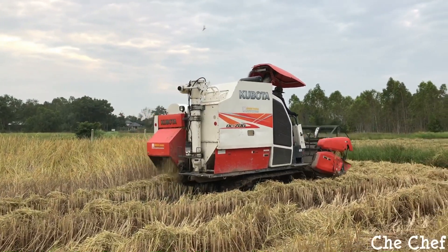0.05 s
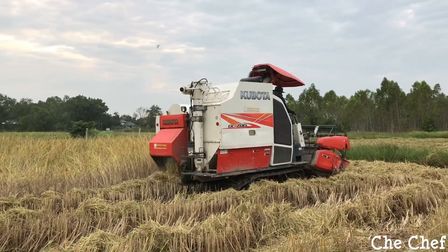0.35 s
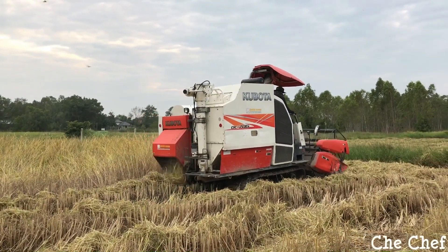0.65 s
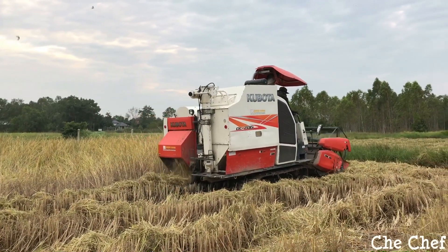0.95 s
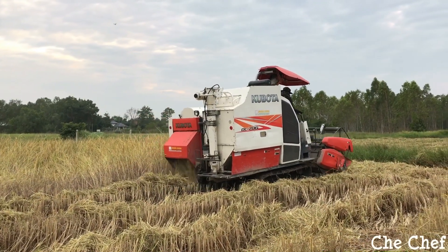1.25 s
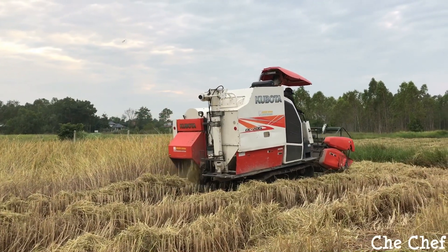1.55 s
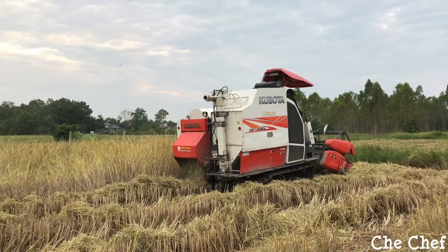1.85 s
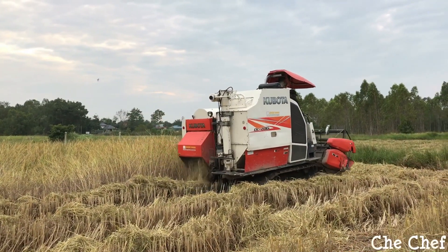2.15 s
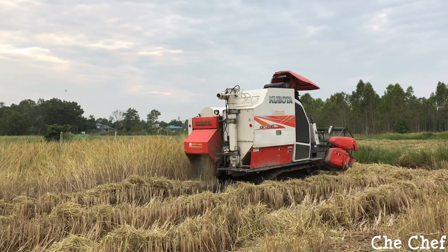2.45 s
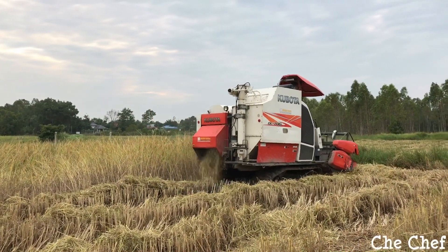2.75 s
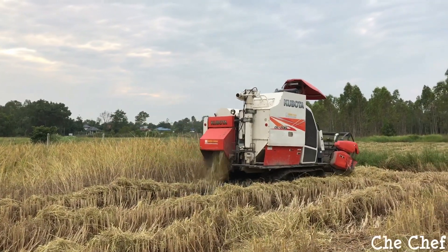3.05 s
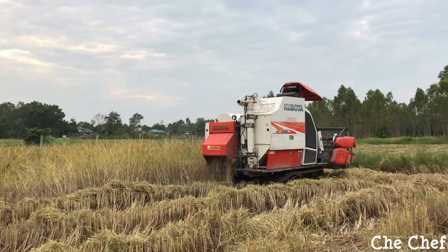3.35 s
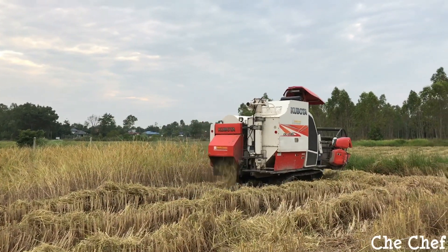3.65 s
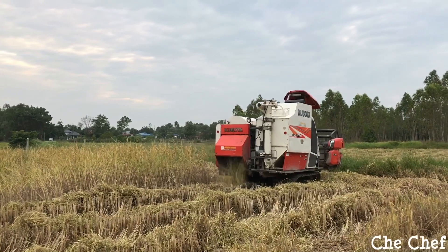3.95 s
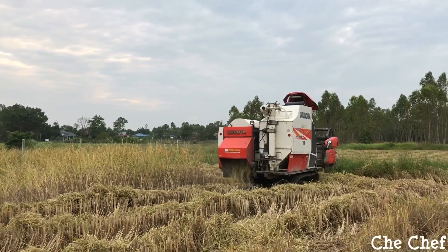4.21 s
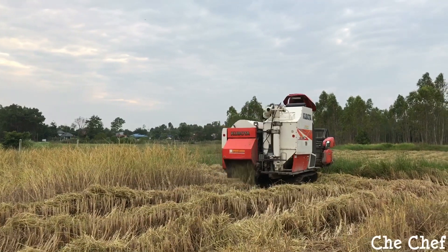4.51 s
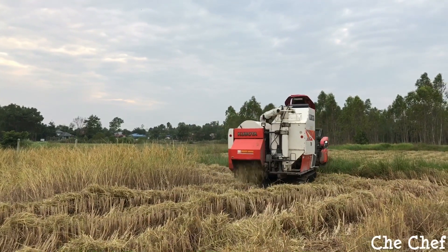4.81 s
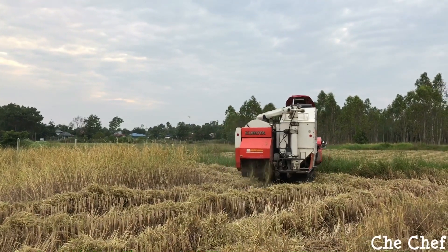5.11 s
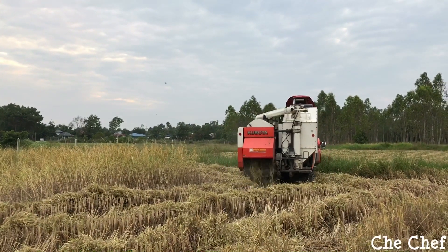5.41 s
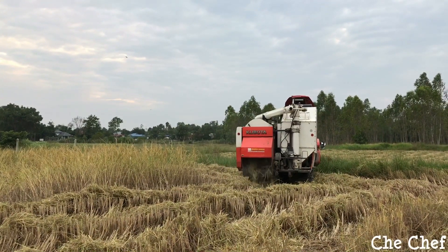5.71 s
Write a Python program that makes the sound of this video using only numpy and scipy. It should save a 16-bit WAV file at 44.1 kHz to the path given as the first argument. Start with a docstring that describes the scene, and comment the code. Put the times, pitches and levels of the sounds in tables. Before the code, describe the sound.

A combine harvester's diesel drones under load with clattering, whining, squealing tracks and rustling straw, fading slightly amid hissing puffs of chaff.

```python
"""An open rice field: a tracked combine harvester cuts, turns its tail to the listener and moves off.
Its four-cylinder diesel drones under load, fans and shafts whine, tracks and belts squeal,
and the thresher clatters as grain pelts its sheet-metal case. Straw rustles throughout;
as the tail swings round, chaff spurts out in puffs whose hiss climbs."""
import sys
import numpy as np
from scipy import signal
from scipy.fft import rfft, irfft
from scipy.io import wavfile

SR = 44100
rng = np.random.default_rng(int(sys.argv[2]) if len(sys.argv) > 2 else 0)


def waveform_to_disk(signal):
    """Save audio, clipped to [-1, 1], as 16-bit WAV at the path in sys.argv[1]."""
    frames = np.transpose(np.atleast_2d(signal))
    scaled = np.clip(frames, -1, 1) * 32767
    samples = np.round(scaled).astype(np.int16)
    wavfile.write(sys.argv[1], SR, samples)


N = 258867


def undb(db):
    """Decibels to gain."""
    return 10 ** (np.asarray(db) / 20)


def unit(x):
    """Scale to rms 1."""
    return x / np.sqrt(np.mean(x ** 2))


def clock():
    """Sample times in seconds."""
    return np.arange(N) / SR


def curves(table):
    """Columns of a timed table, interpolated per sample."""
    times_s, *columns = np.transpose(table)
    return [np.interp(clock(), times_s, column) for column in columns]


def colour(x, spectrum):
    """Filter x by (Hz, dB) points; rms 1."""
    hz, db = np.transpose(spectrum)
    bins_hz = np.maximum(np.arange(N // 2 + 1) * SR / N, 1)
    gain_db = np.interp(np.log(bins_hz), np.log(hz), db, left=-80, right=-80)
    return unit(irfft(rfft(x) * undb(gain_db), N))


def wander(rate_hz):
    """Smooth random drift up to about rate_hz; rms 1."""
    bins_hz = np.arange(N // 2 + 1) * SR / N
    return unit(irfft(rfft(rng.standard_normal(N)) / (1 + (bins_hz / rate_hz) ** 4), N))


def band(hz, width_hz):
    """Noise band round a steady or moving centre; rms 1."""
    phase = 2 * np.pi * np.cumsum(hz * np.ones(N)) / SR
    return unit(wander(width_hz / 2) * np.cos(phase) + wander(width_hz / 2) * np.sin(phase))


def tone(hz, width_hz, waver=0.18):
    """Tone of a rotating part, wandering in pitch and strength; rms 1."""
    phase = 2 * np.pi * np.cumsum(hz + width_hz / 2 * wander(width_hz)) / SR
    return unit((1 + waver * wander(width_hz)) * np.cos(phase))


def impacts(per_s, scatter_db):
    """Dense rain of tiny, uneven blows; rms 1."""
    struck = rng.random(N) < per_s / SR
    polarity = np.sign(rng.standard_normal(N))
    return unit(struck * polarity * undb(scatter_db * rng.standard_normal(N)))


def burst(start_s, rise_s, decay_s):
    """Envelope: fast rise, exponential decay."""
    age_s = np.maximum(clock() - start_s, 0)
    return (1 - np.exp(-age_s / rise_s)) * np.exp(-age_s / decay_s)


def swell(peak_s, sigma_s):
    """Envelope: Gaussian rise and fall."""
    return np.exp(-.5 * ((clock() - peak_s) / sigma_s) ** 2)


def receding_db(start_db, shade_db, half_hidden_s, start_m=11.7, away_m_per_s=0.44, ease_s=0.14):
    """Level of a part that falls with distance and as the turn hides it behind the body."""
    t = clock()
    distance_m = start_m + away_m_per_s * t
    hidden = .5 + .5 * np.tanh(.5 * (t - half_hidden_s) / ease_s)
    return start_db - 20 * np.log10(distance_m / start_m) - shade_db * hidden


# Fan and shaft tones, plus one wide ring of the sheet-metal case near 1 kHz: (pitch [Hz], width [Hz], level
# [dB], peak time [s], sigma [s])
MACHINE_TONES = [(388.4, 5.1, -46, 3.2, 1.5), (536.7, 4.1, -43, 0.71, 1.3), (837, 9, -43, 0.22, 1.1),
                 (1827, 6.5, -45.5, 1, 1.6), (1300, 8, -40, 0.7, 0.65), (690, 16, -40, .75, 0.31),
                 (1010, 50, -43, 3.4, 0.77), (678, 9.1, -36.5, 4.98, 0.19), (697, 7.2, -40.5, 5.3, 0.75),
                 (664, 7.9, -37.5, 5.61, 0.21), (1277, 8.3, -44, 5.4, 0.51)]


def whines():
    """Fans and shafts whine and the case rings, each loudest while it faces the listener."""
    return sum(tone(hz, width_hz) * undb(db) * swell(peak_s, sigma_s)
               for hz, width_hz, db, peak_s, sigma_s in MACHINE_TONES)


# Track and belt squeals: (peak time [s], pitch [Hz], width [Hz], level [dB], sigma [s])
SQUEAL_TONES = [(1.9, 1400, 14, -38, 0.085), (2.35, 1358, 11.3, -38.5, .2), (2.65, 1814, 13, -41.5, .14),
                (2.7, 795, 30, -40, 0.19), (3.1, 1303, 45, -38.5, 0.28), (4.196, 1840, 7.1, -39, 0.073),
                (4.552, 2017, 90, -43.5, 0.33), (4.65, 1368, 13.7, -41.5, .35)]


def squeals():
    """Tracks and belts squeal briefly."""
    return sum(tone(hz, width_hz) * undb(db) * swell(peak_s, sigma_s)
               for peak_s, hz, width_hz, db, sigma_s in SQUEAL_TONES)


# Chaff stream: (time [s], centre [Hz], steady level [dB])
CHAFF_FLOW = [(0, 3987, -58), (2.7, 3982, -52), (3.3, 4300, -40), (3.6, 4750, -48), (3.85, 6150, -46),
              (4.1, 7250, -43), (4.35, 7790, -47), (4.55, 8560, -49), (4.8, 9000, -47), (5.2, 9152, -46),
              (5.87, 9380, -52)]
# Chaff puffs: (time [s], gain [dB])
CHAFF_PUFFS = [(3.55, -37), (3.82, -35), (4.09, -37), (4.306, -34), (4.512, -32.5), (4.755, -35),
               (4.96, -33), (5.165, -41), (5.35, -39), (5.573, -39.5), (5.72, -40)]


def chaff(spray_gain=0.3):
    """Chaff hisses from the tail, about five puffs a second: a focused jet inside a wider spray."""
    centre_hz, flow_db = curves(CHAFF_FLOW)
    puffs = sum(undb(db) * burst(start_s, rise_s=.007, decay_s=.065) for start_s, db in CHAFF_PUFFS)
    jet = band(centre_hz, width_hz=1340)
    spray = band(centre_hz, width_hz=3800)
    return unit(jet + spray_gain * spray) * np.hypot(undb(flow_db), puffs)


# Straw rustle: (frequency [Hz], relative level [dB])
STRAW_SPECTRUM = [(2000, -12.5), (4000, 4), (5000, -1), (5700, 1.5), (6900, 0.5), (7600, -1), (8400, 0),
                  (9200, 0.5), (9800, -3.5), (10500, -24.5)]
# Bunches cut: (time [s], gain [dB], centre [Hz])
STRAW_CRUNCHES = [(.14, -37, 8500), (.73, -36, 8000), (1.21, -40, 7500), (1.686, -36, 6000),
                  (2.51, -38, 8000), (3.275, -29, 4230), (3.28, -33, 7640), (3.39, -35, 6300),
                  (4.31, -33, 8340), (4.755, -34.5, 7830)]


def straw(flicker_db=0.76):
    """Dry stalks snap by the thousand; now and then the knives crunch a whole bunch."""
    level_db = receding_db(start_db=-36, shade_db=2, half_hidden_s=4.6)
    snaps = colour(impacts(per_s=20000, scatter_db=2.5), STRAW_SPECTRUM)
    rustle = snaps * undb(level_db + flicker_db * wander(16))
    crunches = sum(band(hz, width_hz=3700) * undb(db) * burst(start_s, rise_s=.0024, decay_s=.029)
                   for start_s, db, hz in STRAW_CRUNCHES)
    return rustle + crunches


def panel_reflection(x, lag_s=.0065, sway_s=0.000493, gain=0.2):
    """Add a path off the side panels, its length swaying as the machine rocks over ruts; rms 1."""
    t = clock()
    reflected = np.interp(t - lag_s - sway_s * wander(1.135), t, x)
    return unit(x + gain * reflected)


# Sheet-metal case: (frequency [Hz], relative level [dB])
CASE_SPECTRUM = [(250, -19.5), (440, -10.5), (515, -0.5), (565, -2.5), (615, 3.5), (710, 2.5), (745, -0.5),
                 (830, 1), (890, -1), (1050, 1.5), (1360, -0.5), (1420, -3.5), (1700, -6), (2300, -11.5),
                 (4000, -18.5)]
# Chains and injectors: (frequency [Hz], relative level [dB])
RATTLE_SPECTRUM = [(900, -20.5), (1600, 4), (2100, 1), (2600, 0), (2950, -3.5), (3180, 1), (3400, -4),
                   (3700, -3), (4100, -8.5), (4900, -11.5), (7000, -24)]


def thresher(firings, knock_depth=0.1, uneven_feed_db=0.54):
    """Unevenly fed grain and stalks pelt the case; chains and injectors rattle with the crankshaft."""
    case_db = receding_db(start_db=-27.5, shade_db=1.5, half_hidden_s=4.37)
    rattle_db = receding_db(start_db=-33, shade_db=5, half_hidden_s=4.67)
    feed_db = uneven_feed_db * wander(5.1)
    crank = 1 + knock_depth * np.cos(np.pi * firings)  # two firings per revolution
    case = panel_reflection(colour(impacts(per_s=8000, scatter_db=3), CASE_SPECTRUM))
    rattle = panel_reflection(colour(impacts(per_s=16000, scatter_db=2.5) * crank, RATTLE_SPECTRUM))
    return case * undb(case_db + feed_db) + rattle * undb(rattle_db + feed_db)


# Exhaust gas noise: (frequency [Hz], relative level [dB])
GAS_SPECTRUM = [(20, -43), (30, -26), (42, -8.5), (55, -3.5), (80, -0.5), (130, 1), (210, 1), (290, -3),
                (370, -5.5), (430, -18.5), (600, -24.5), (1500, -53)]


def exhaust_rumble(firings, gas_db, throb_depth=0.17):
    """Gas leaves the pipe in turbulent gulps, one per firing."""
    gas = rng.standard_normal(N) * (1 + throb_depth * np.cos(2 * np.pi * firings))
    return colour(gas, GAS_SPECTRUM) * undb(gas_db)


# Exhaust harmonics 1 and 2: (time [s], firing tone [dB], octave [dB])
LOW_HARMONICS = [(0.0, -20.5, -19.5), (0.2, -19, -16), (0.72, -18, -21), (1.2, -18.5, -15.5),
                 (1.6, -22, -19.5), (2.18, -23.5, -20.0), (2.4, -21.5, -17.5), (2.95, -27, -19),
                 (3.55, -22.5, -19), (4.35, -19.0, -21.5), (4.95, -21, -23.0), (5.5, -25.5, -27.5),
                 (5.87, -21, -29)]
# Harmonic 3, fading as the outlet points away: (time [s], level [dB])
THIRD_HARMONIC = [(0, -26), (.18, -33), (.33, -23), (.9, -32), (1.13, -22.5), (1.4, -30), (2.15, -27),
                  (3.2, -32.5), (4.5, -36.5), (5.05, -43), (5.87, -31.5)]
# Weak engine partials: (frequency [x firing rate], base level [dB])
ENGINE_PARTIALS = [(1.5, -47.5), (2.5, -51), (3.5, -45.5), (4, -44.5), (5, -56), (6, -50), (7.5, -47.5),
                   (15, -52.5)]


def exhaust_drone(firings, gas_db, roughness=0.049, flutter_depth=0.32, waver_db=.5):
    """The silencer passes three harmonics of each firing's front; unequal cylinders add partials."""
    phase = 2 * np.pi * (firings + 0.0053 * wander(7.7))
    smear_rad = 0.38 + 0.72 * wander(1.1)  # changing ground path: front now crisp, now rounded
    drone = partials = 0
    for k, db in enumerate(curves(LOW_HARMONICS) + curves(THIRD_HARMONIC), 1):
        gain = undb(db + k * waver_db * wander(5.1))
        drone += gain * np.sin(k * phase - (k - 1) ** 2 * smear_rad)
    for order, db in ENGINE_PARTIALS:
        flutter = 1 + flutter_depth * (wander(4.7) + 1j * wander(4.9))
        partials += undb(db) * np.real(flutter * np.exp(1j * order * phase))
    drone *= 1 + roughness * wander(25)
    partials *= undb(gas_db - np.mean(gas_db))
    return -np.sqrt(2) * (drone + partials)


# Governed engine speed: (time [s], firing rate [Hz])
FIRING_RATE = [(0, 89.8), (1.4, 89.53), (1.8, 90.72), (2.5, 89.4), (3.2, 90.03), (3.8, 90.35), (4.7, 90.06),
               (5.1, 91.15), (5.5, 92.54), (5.87, 91)]


def scene():
    """Mono mix, no reverberation; exhaust and rattle share the engine's timing."""
    firing_hz, = curves(FIRING_RATE)
    firings = np.cumsum(firing_hz) / SR
    gas_db = receding_db(start_db=-25, shade_db=0.5, half_hidden_s=4.5)
    engine = exhaust_drone(firings, gas_db) + exhaust_rumble(firings, gas_db)
    return (engine + whines() + squeals() + thresher(firings) + straw() + chaff())[None]


def record(dry):
    """Steep low-pass."""
    cutoff_hz = 10250
    return signal.sosfilt(signal.ellip(10, .2, 80, cutoff_hz, fs=SR, output="sos"), dry)


dry = scene()
out = record(dry)
waveform_to_disk(out)
```